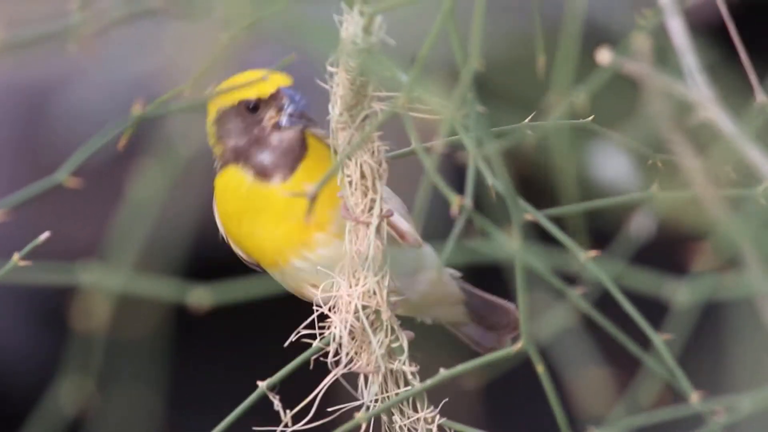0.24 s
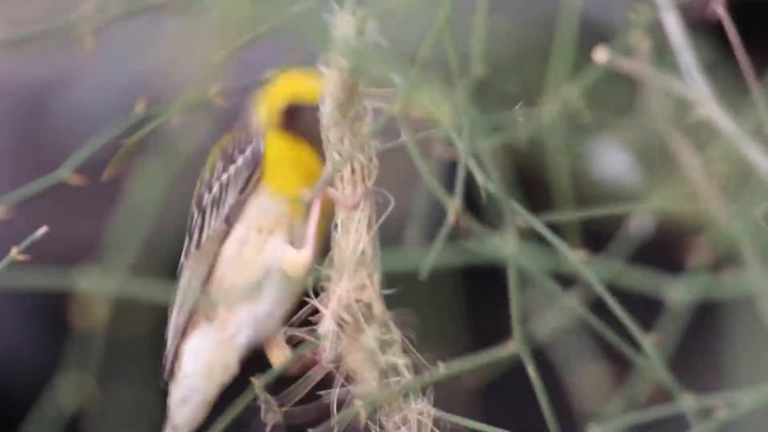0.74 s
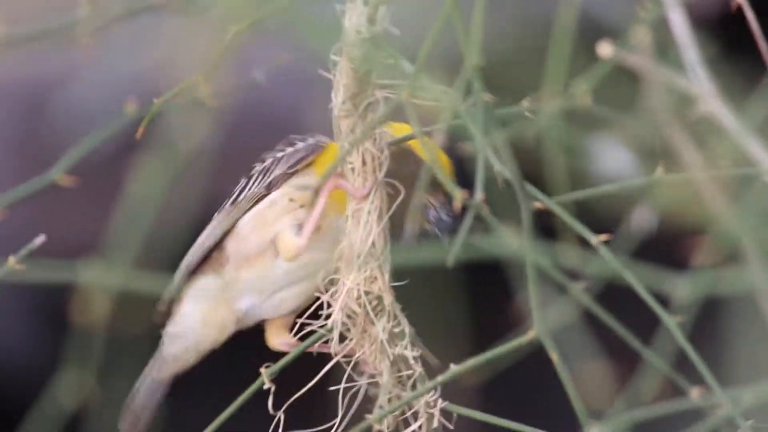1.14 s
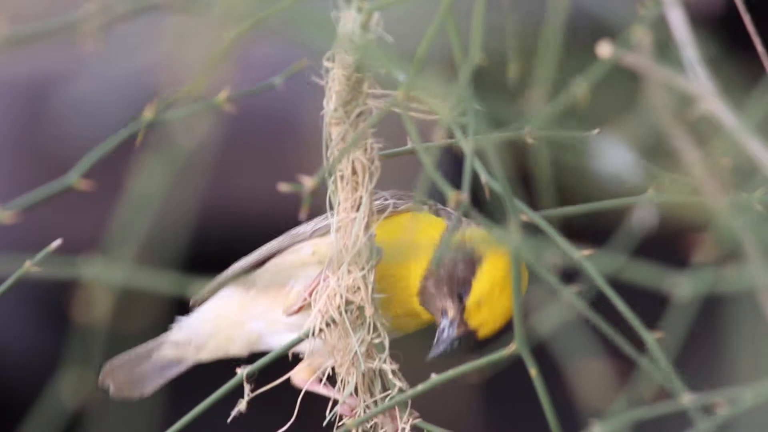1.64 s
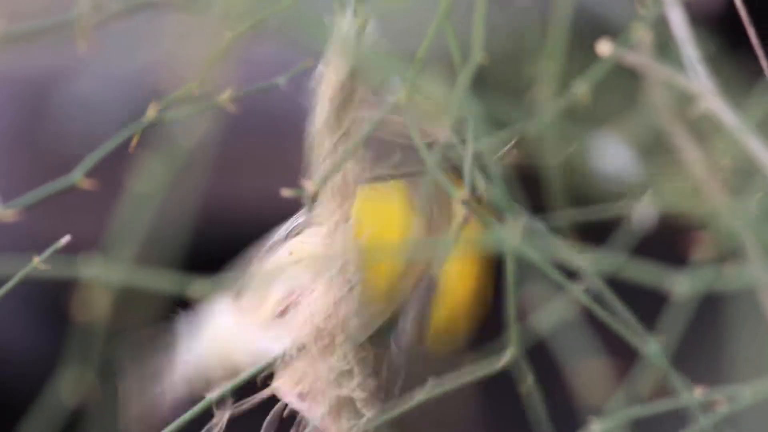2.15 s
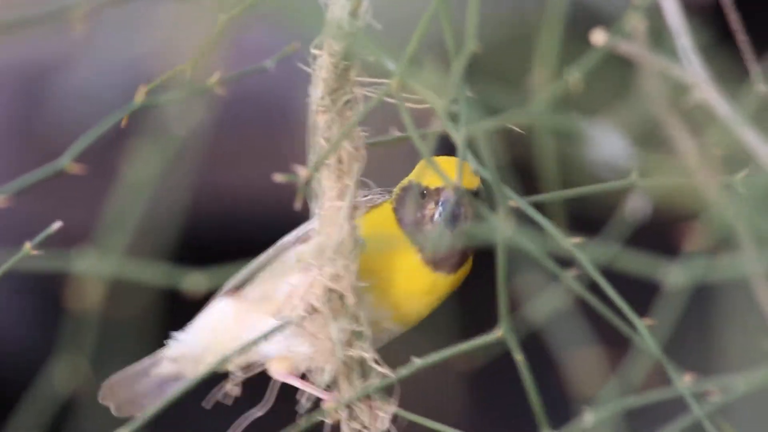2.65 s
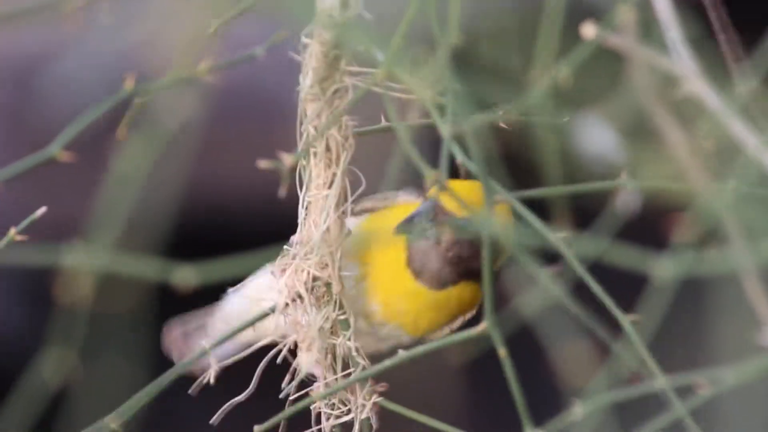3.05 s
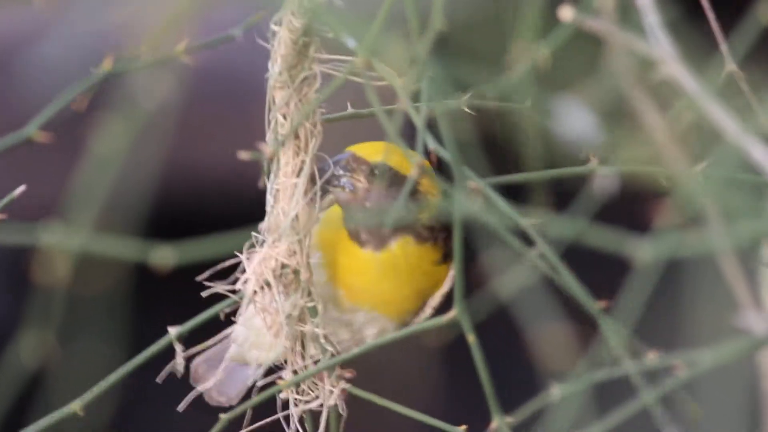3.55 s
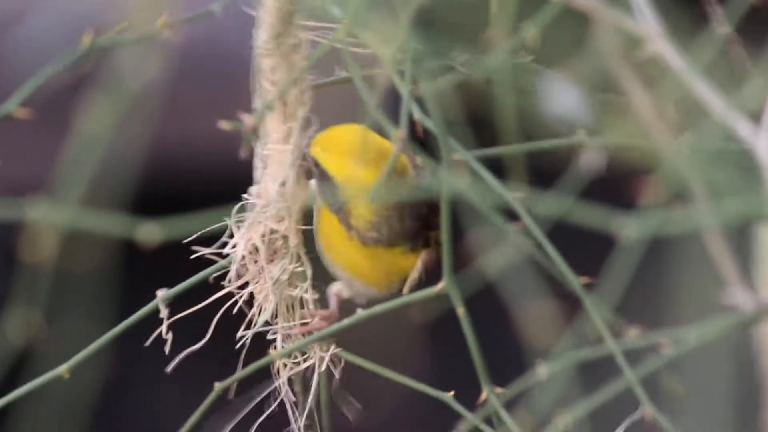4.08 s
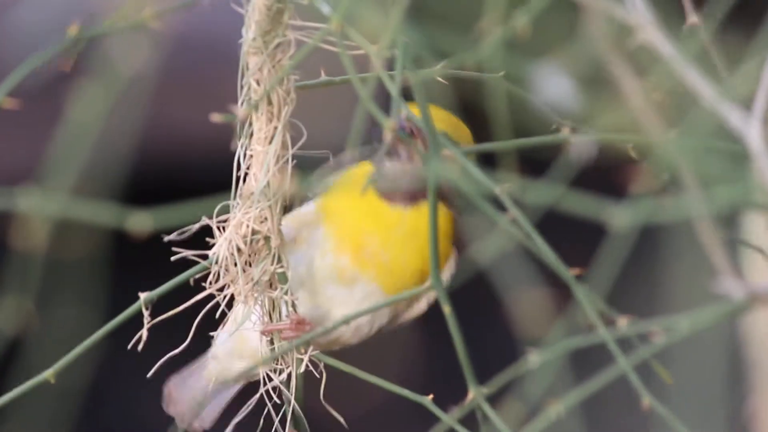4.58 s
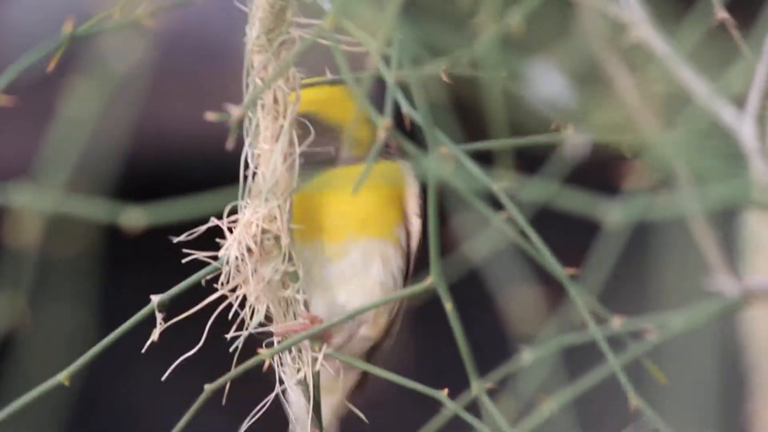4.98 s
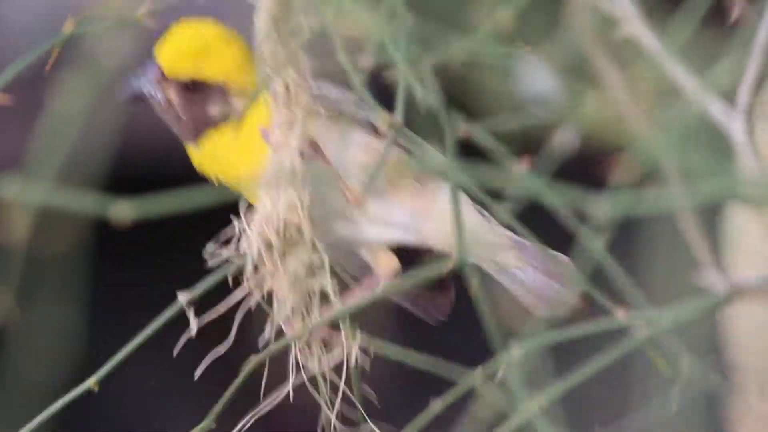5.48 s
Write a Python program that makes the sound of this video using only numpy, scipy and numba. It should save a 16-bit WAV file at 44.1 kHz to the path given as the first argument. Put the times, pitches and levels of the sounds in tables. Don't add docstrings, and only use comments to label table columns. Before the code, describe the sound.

A weaver bird colony chips, chirps and whistles rapidly in thorn scrub, turning to a noisy wheeze over plopping water and soft hiss.

```python
import sys
import numpy as np
from scipy import signal
from scipy.fft import rfft, irfft
from scipy.io import wavfile
from scipy.ndimage import uniform_filter1d
from numba import njit

SR = 44100
rng = np.random.default_rng(int(sys.argv[2]) if len(sys.argv) > 2 else 0)


def wav_out(sig):
    wavfile.write(sys.argv[1], SR, np.round(np.clip(np.atleast_2d(sig).T, -1, 1) * 32767).astype(np.int16))


def elevation(decibels):
    levels = np.asarray(decibels, float)
    return 10 ** (levels / 20)


N = 252252
TIME = np.arange(N) / SR

# (time [ms], pitch [Hz], level [dB])
CHIP = [(-14, 5250, -7), (-7.5, 4400, -6.5), (-3.5, 4080, -2), (5, 4230, 1), (10, 5250, -10),
        (15.5, 3500, -6), (19.5, 3950, -3.5), (25.5, 3330, -5), (32, 3325, -5)]
# (time [ms], pitch [Hz], level [dB])
CHIRP = [(-11, 3800, 3.5), (-5, 4800, -2), (-1.5, 5900, 0.5), (2.5, 5350, 3), (12, 3420, -4.5),
         (17, 3800, -5.5), (22, 3950, -2.5), (28.5, 5500, -0.5), (41, 2550, -9)]
# (multiple of pitch [1], level [dB])
CHIP_TONES = [(1, 2), (2, -36.5)]
CHIRP_TONES = [(1, 4), (2, -6.5), (3, -3.5), (4, -27.5)]
TWEET_TONES = [(1, 0), (2, -37)]


def level(x, db):
    return x * elevation(db) / np.sqrt(np.mean(x ** 2))


def sides(pan_db):
    return elevation(np.array([[pan_db / 2], [-pan_db / 2]]))


def on_log(table, hz):
    f, v = np.transpose(table)
    return np.interp(np.log(hz + 1), np.log(f), v)


def walk(rate):
    hold = int(SR / rate)
    steps = np.repeat(rng.standard_normal(N // hold + 1), hold)
    return 1.3 * uniform_filter1d(uniform_filter1d(steps, hold), hold)[:N]


@njit
def moving_band_pass(x, hz, width):
    y, band, low = np.empty(len(x)), 0., 0.
    for i in range(len(x)):
        g, damping = np.tan(np.pi * hz[i] / SR), width / hz[i]
        v = (band + g * (x[i] - low)) / (1 + g * (g + damping))
        band, low, y[i] = 2 * v - band, low + 2 * g * v, damping * v
    return y


def rasp(throat, per_s):
    pulses = (rng.random(N) < per_s / SR) * rng.standard_normal(N)
    pulses = pulses + 0.079 * rng.standard_normal(N)
    voice = 0
    for hz, width, db in throat:
        centre = hz + np.zeros(N)
        once = moving_band_pass(pulses, centre, 1. * width)
        voice = voice + level(moving_band_pass(once, centre, 1. * width), db)
    return voice


def sing_note(out, s, hz, db, tones, pan_db, waver=.011, flutter_db=3.2):
    # (frequency [Hz], gain [dB])
    beak = [(2000, -3), (4500, 0), (5800, 0), (7200, 5), (9000, -5), (11000, -10), (16000, -19)]
    i = np.arange(max(int(s[0] * SR), 0), min(int(s[-1] * SR), N))
    if len(i) < 90:
        return
    smooth = lambda v: uniform_filter1d(v, size=80)
    chance = 9 * rng.standard_normal((2, len(i)))
    pitch = smooth(np.interp(i / SR, s, hz) * (1 + waver * chance[0]))
    edge = np.clip(np.minimum(i - i[0], i[-1] - i) / (.003 * SR), 0, 1)
    phase = 2 * np.pi * (np.cumsum(pitch) / SR + rng.random())
    overtone_flutter = flutter_db * smooth(chance[0, ::-1])
    wave = 0
    for k, tone_db in tones:
        gain_db = tone_db + on_log(beak, k * pitch) + (k > 1) * overtone_flutter
        wave = wave + elevation(gain_db) * np.sin(k * phase) * (k * pitch < .4 * SR)
    loudness = elevation(smooth(np.interp(i / SR, s, db) + flutter_db * chance[1]))
    out[:, i] += sides(pan_db) * np.sqrt(2) * wave * edge * loudness


def repeat(out, shape, rows, tones):
    ms, hz, db = np.transpose(shape)
    for s, peak_db, factor, pan_db in rows:
        sing_note(out, s + ms / 1000, hz * factor, db + peak_db, tones, pan_db)


def air():
    # (frequency [Hz], density [dB per Hz])
    spectrum = [(18, -54.5), (30, -25.5), (173, -15), (546, -18), (1330, -10), (2020, -10), (2840, -9),
                (3230, -4), (4090, -3.5), (4420, -10.5), (9940, -23), (15500, -39.5)]
    # (frequency [Hz], left-right correlation [1])
    likeness = [(40, -.75), (85, -.6), (150, .7), (600, .9), (3000, .55), (8000, .3), (15000, -.2)]
    hz = np.fft.rfftfreq(N, 1 / SR)
    like = np.clip(on_log(likeness, hz), -1, 1)
    colour = elevation(on_log(spectrum, hz))
    mid = rfft(rng.standard_normal(N)) * colour
    side = rfft(rng.standard_normal(N)) * colour * np.sqrt((1 - like) / (1 + like))
    pan_db = np.where(hz < 90, 3.2, -3.9)
    pair = np.array([mid + side, mid - side]) * elevation(pan_db * np.array([[.5], [-.5]]))
    edges = [250, 400, 600, 850, 1200, 1700, 2500]
    out = irfft(pair * ((hz < edges[0]) | (hz >= edges[-1])), N)
    for lo, hi in zip(edges, edges[1:]):
        flicker_db = 1.8 * walk(30) - 1.5
        out += irfft(pair * (hz >= lo) * (hz < hi), N) * elevation(flicker_db)
    return level(out, -31.5)


def water(count=130):
    # (time [s], peak level [dB], pitch [Hz], pitch change per ring [factor])
    plops = [(.335, -22, 941, 1.92), (.858, -25.5, 913, 1.53), (1.354, -22.5, 740, 0.74),
             (1.684, -34, 795, 1.48), (2.334, -22, 920, 1.05), (2.375, -24.5, 895, 1.4),
             (2.467, -29.5, 343.5, 0.82), (2.504, -28.5, 685, 0.82), (3.786, -28.5, 900, 1.55),
             (3.827, -28.5, 545, 0.89), (3.956, -28.5, 792, 1.27), (4.662, -27.5, 840, 0.75),
             (5.359, -32, 784, 0.82), (5.498, -32, 623, 1.64), (5.597, -28, 680, 0.47)]
    drips = [(.596, -23.5, 1565, 0.56), (0.6975, -20, 1603, 1.56), (.835, -26, 1790, 1.54),
             (2.373, -32, 1540, 1.1), (3.216, -21.5, 2120, 0.96), (3.301, -18, 2136, 0.96),
             (4.029, -28, 1390, 0.99), (4.215, -27.5, 1516, 0.98), (5.5941, -25.5, 1407, 2.4)]
    gurgles = [(.942, -36.5, 601, 1.96), (1.482, -37.5, 380.8, 1.07), (1.538, -37.5, 615, 1.95),
               (1.8, -40.5, 738, 1.07), (2.045, -43, 591.7, 1.27), (2.072, -43.5, 600.6, 1.104),
               (2.098, -46.5, 597.6, 0.85)]
    clops = [(.337, -28, 600, 1.2), (2.329, -21, 500, 1.3), (3.787, -29, 600, 1.2), (4.286, -25, 520, 1.2),
             (4.408, -33, 700, 1.2), (5.004, -29, 480, 1.2)]
    kinds = [(plops, 6.3), (drips, 7.0), (gurgles, 19), (clops, 1.6)]
    bubbles = [(*row, cycles) for rows, cycles in kinds for row in rows]
    when, size, pitch, ring = rng.random((count, 4)).T
    faint = [when * N / SR, -48 + 10 * size, 480 * 3.5 ** pitch, 0.51 + 1.05 * ring, 3 + 9 * ring]
    out = np.zeros(N + SR)
    for s, db, hz, rise, cycles in bubbles + list(np.transpose(faint)):
        cycles = max(cycles, 1)
        u = np.arange(int(2 * cycles / hz * SR)) * hz / SR / cycles
        phase = 2 * np.pi * np.cumsum(hz * rise ** (u - .4)) / SR
        envelope = np.exp(-2.3 * u) * np.minimum(u / 0.0506, 1)
        out[int(s * SR):int(s * SR) + len(u)] += elevation(db) * np.sin(phase) * envelope
    return sides(-9.0) * out[:N]


def scrub(x, t60=.4):
    t = np.arange(int(.5 * SR)) / SR
    decay = np.exp(-np.log(1000) * t / t60) * np.minimum(t / .02, 1)
    tail = rng.standard_normal((2, len(t))) * decay
    tail = 2.13 * tail + 0.225 * tail[::-1]
    tail = signal.lfilter([1], [1, -.45], tail)
    tail /= np.sqrt(np.sum(tail ** 2, axis=1, keepdims=True))
    for late_s in (.066, .102):
        tail[:, int(late_s * SR)] += elevation(-8)
    return sides(-0.5) * signal.fftconvolve(x.mean(0)[None], tail, axes=1)[:, :N]


def twigs(x, count=22):
    lag, size = rng.random((2, 2, count))
    out = x.copy()
    for ear in range(2):
        delays = (lag[ear] * 0.028 * SR).astype(int) + 30
        for late, gain in zip(delays, size[ear]):
            out[ear, late:] += elevation(-14.5) * (2 * gain - 1) * x[ear, :-late]
    return out


def far_flock(count=520):
    # (time [s], level [dB])
    swell = [(0, -35), (.46, -34.5), (.62, -38.5), (1.65, -32.5), (2.01, -46.5), (2.26, -33.5),
             (2.75, -37.5), (3.45, -30.5), (4.0, -27), (4.5, -29.5), (4.75, -25.5), (5.0, -28.5),
             (5.2, -22), (5.55, -26), (5.72, -24.5)]
    out = np.zeros((2, N))
    when, size, pitch, place = rng.random((count, 4)).T
    rows = np.transpose([when * N / SR, 9 * size, .9 + .2 * pitch, -3.5 + 16 * (place - .5)])
    repeat(out, CHIP, rows[::2], CHIP_TONES)
    repeat(out, CHIRP, rows[1::2], CHIRP_TONES)
    return level(out, -2.0) * elevation(np.interp(TIME, *np.transpose(swell)))


def scolding():
    # (start [s], held [s], level [dB])
    scolds = [(-.02, 0.0197, -39), (.25, 0.054, -49), (.56, .04, -55), (.75, 0.0414, -37.5),
              (1.22, .05, -55.5), (1.505, 0.0275, -38), (1.85, 0.017, -44.5), (2.45, 0.03, -48),
              (2.73, 0.092, -47.5), (2.83, .003, -39.5), (2.985, 0.096, -41), (3.15, 0.15, -41.5),
              (3.245, 0.0717, -34.5), (3.44, 0.28, -39.5), (3.68, 0.029, -37.5), (3.83, 0.075, -40),
              (3.92, 0.185, -44), (4.615, 0.016, -37.5), (4.65, .27, -41), (4.935, 0.0095, -38),
              (5.15, .15, -38.5), (5.325, 0.024, -35.5), (5.44, 0.059, -42), (5.68, 0.026, -40)]
    # (frequency [Hz], width [Hz], level [dB])
    throat = [(2298, 1052, 4), (4300, 1040, 5.5), (6500, 1100, 7), (9360, 4200, -0.5), (12740, 960, -17.5)]
    pair = sum(sides(pan_db) * rasp(throat, 2000) for pan_db in (-12.0, 8.0))
    s, held, db = np.transpose(scolds)[:, :, None]
    swell_db = 400.5 * np.maximum(s - TIME, 0)
    fade_db = 284.5 * np.maximum(TIME - s - held, 0)
    effort_db = db - swell_db - fade_db
    return pair * elevation(np.maximum(effort_db.max(0), -54) - 9)


def wheeze():
    # (time [s], effort [dB], throat resonance [Hz], its strength [dB])
    effort = [(3.41, -57.5, 4060, 0), (3.45, -31.5, 3958, 1.5), (4.0, -30.5, 4300, 0.5),
              (4.3, -29.5, 4410, 0.5), (4.62, -29, 4377, -2), (4.72, -31, 4350, -15),
              (5.02, -32.5, 3920, -15.5), (5.3, -27.5, 4250, -7.5), (5.55, -35.5, 4010, -4),
              (5.72, -31.5, 4350, -8)]
    # (frequency [Hz], width [Hz], level [dB])
    steady = [(3132, 1120, -2), (3700, 496, -6.5), (5600, 646, -1), (7000, 1200, -13)]
    s, effort_db, mouth_hz, mouth_db = np.transpose(effort)
    moving = (np.interp(TIME, s, mouth_hz), 260, np.interp(TIME, s, mouth_db))
    pair = sum(sides(pan_db) * rasp(steady + [moving], 700) for pan_db in (-10.0, 1.5))
    return pair * elevation(np.interp(TIME, s, effort_db, left=-99, right=-99) - 6.5 + walk(30))


def trill():
    # (time [s], pitch [Hz], level [dB])
    whistle = [(2.63, 2770, -37), (2.681, 2755, -38.5), (2.735, 2948, -26.5), (2.781, 3201, -25),
               (2.922, 3140, -26), (3.029, 3042, -21.5), (3.068, 3024, -45), (3.102, 3070, -26),
               (3.149, 2984, -48)]
    out = np.zeros((2, N))
    sing_note(out, *np.transpose(whistle), TWEET_TONES, -3.0, waver=0.00102, flutter_db=1.0)
    depth = np.clip((2.965 - TIME) / .02, 0, 1) * np.clip((TIME - 2.685) / .02, 0, 1)
    throb = np.cos(2 * np.pi * 57.7 * (TIME - 2.84))
    open_share = np.clip(.55 + .8 * throb, 0, 1)
    return out * (1 + depth * (1.48 * open_share - 1))


def perched_birds():
    # (start [s], length [s], middle pitch [Hz], level [dB]); the two 4 kHz pips at 1.77
    # s and 1.794 s are echoes of the chip at 1.705 s
    arches = [(.718, 0.037, 7430, -39), (.8, 0.0413, 6403, -35.5), (1.297, 0.0097, 5284, -27),
              (1.395, 0.0577, 6954, -36.5), (2.895, 0.035, 7100, -37.5), (3.482, 0.032, 6960, -33.5)]
    falls = [(3.32, 0.0166, 5200, -31), (3.472, 0.0092, 6860, -27), (3.657, 0.031, 4916, -31.5),
             (3.687, 0.0086, 7060, -31.5), (3.863, 0.0157, 7340, -33), (3.997, 0.0121, 7000, -35.5),
             (4.065, 0.017, 7410, -36), (4.088, 0.014, 6550, -29.5), (4.738, 0.0312, 3911, -24)]
    rises = [(.298, 0.021, 3990, -25.5), (.32, 0.0165, 3575, -25.5), (1.493, 0.031, 6670, -36),
             (5.42, .024, 4650, -23)]
    pips = [(.003, 0.0243, 6140, -28), (.202, 0.0255, 6600, -42), (.293, 0.0126, 3036, -28),
            (.942, 0.036, 4900, -32), (1.658, 0.0304, 6130, -31.5), (1.77, .014, 4050, -29.5),
            (1.794, .02, 4060, -31.5), (2.203, 0.017, 5500, -37), (3.265, 0.0157, 6650, -46),
            (4.532, 0.0306, 6900, -39.5), (4.56, 0.0118, 6950, -42.5), (4.768, 0.0125, 6450, -36),
            (4.858, 0.036, 6200, -34.5), (5.158, 0.016, 5600, -40.5), (5.195, 0.028, 5600, -26),
            (5.208, 0.015, 4250, -38), (5.35, 0.0112, 5100, -24), (5.545, 0.01025, 5450, -37),
            (5.65, 0.0098, 7500, -33), (5.652, 0.013, 5800, -28.5), (5.695, 0.022, 5300, -26.5),
            (5.087, 0.033, 5500, -34), (5.154, 0.037, 7090, -36), (5.276, 0.0125, 5450, -39),
            (5.299, 0.0123, 5550, -31), (5.313, 0.0103, 5400, -21.5), (5.498, 0.0214, 5430, -31.5),
            (5.41, 0.022, 5800, -30)]
    # (time [s], pitch [Hz], level [dB])
    whistles = [
        [(.932, 3500, -26), (.944, 4330, -27), (.965, 4120, -24.5), (.986, 3850, -26)],
        [(3.2, 3604, -40), (3.21, 3744, -42.5), (3.222, 3760, -27), (3.314, 3765, -29.5), (3.32, 3774, -38.5),
         (3.35, 3720, -39.5)],
        [(4.665, 4900, -36), (4.68, 4850, -29), (4.708, 4780, -24.5), (4.72, 4650, -29), (4.74, 4450, -23),
         (4.8, 4150, -21), (4.846, 3950, -23), (4.875, 4000, -27.5), (4.93, 4049, -43.5)],
        [(4.955, 2950, -38), (4.975, 2450, -33.5), (4.99, 2150, -37), (5.0, 2050, -40), (5.015, 2020, -40),
         (5.052, 2020, -32.5)],
        [(5.222, 5300, -25.5), (5.235, 4750, -25), (5.248, 4400, -26), (5.264, 4150, -27.5), (5.28, 4550, -27),
         (5.288, 4650, -20), (5.302, 4120, -22.5)],
        [(5.305, 4446, -27), (5.348, 4135, -22.5), (5.402, 3887, -22.5), (5.44, 3760, -29), (5.452, 3950, -22),
         (5.46, 4500, -33.5)],
        [(5.46, 4950, -21.5), (5.475, 4350, -24), (5.492, 4100, -30), (5.509, 4650, -24.5)],
        [(5.52, 4150, -29), (5.534, 4150, -31), (5.547, 4700, -24)],
    ]
    out = np.zeros((2, N))
    arc = np.linspace(0, 1, 9)
    kinds = [(arches, .82, .84), (falls, 1.13, .88), (rises, .87, 1.09), (pips, 1.005, .97)]
    for rows, first, last in kinds:
        bend = first + (last - first) * arc + (1 - (first + last) / 2) * 4 * arc * (1 - arc)
        for s, length, hz, db in rows:
            swell_db = db - 5 * (2 * arc - 1) ** 2
            sing_note(out, s + length * arc, hz * bend, swell_db, TWEET_TONES, -3.0, waver=.007)
    for note in whistles:
        sing_note(out, *np.transpose(note), TWEET_TONES, -3.5, waver=.003, flutter_db=1.5)
    return out


def bush_birds():
    # (time [s], level [dB], pitch factor [1], left minus right [dB])
    chips = [(-0.004, -22, 0.986, -8.5), (0.185, -25.5, 0.959, -7), (0.399, -25.5, 0.96, -6.5),
             (0.582, -25, 0.979, -9), (0.778, -23, 0.983, -4.5), (0.992, -25, 0.899, -8),
             (1.204, -26.5, 0.965, -8), (1.477, -24.5, 0.959, -6.5), (1.705, -25, 0.981, -8),
             (1.954, -26.5, 0.956, -8.5), (2.16, -26.5, 0.949, -9), (2.331, -26, 1, -7.5),
             (2.508, -25, 0.951, -4), (2.699, -28, 0.908, -10), (2.916, -25.5, 0.984, -7),
             (3.164, -28, 0.984, -12.5), (3.372, -25.5, 0.922, -6.5), (3.544, -28.5, 0.968, -8.5),
             (3.698, -29.5, 0.97, -8.5), (3.9, -29, 0.947, -10)]
    chirps = [(0.26, -30.5, 0.954, -3), (0.564, -30, 0.967, -0.5), (0.786, -32.5, 0.978, -1.5),
              (1.23, -29.5, 0.933, -1), (1.513, -32.5, 0.969, -0.36), (2.453, -31, 0.95, -1),
              (2.723, -29.5, 0.911, -1.5), (2.993, -27, 0.977, -2), (3.15, -28, 0.931, -2.6),
              (3.817, -31, 0.936, -3), (4.613, -28.5, 1.0, -1.67), (4.932, -29, 0.842, 0),
              (5.167, -34.5, 0.976, 1), (5.694, -40.5, 1, 2.5)]
    # (time [s], pitch [Hz], level [dB])
    warbles = [
        [(.345, 4416, -26), (.36, 3700, -31), (.372, 3225, -28), (.38, 3070, -34)],
        [(1.9, 5600, -38), (1.912, 5400, -33), (1.922, 7100, -40), (1.93, 7422, -40), (1.949, 6500, -34.5)],
        [(1.995, 5380, -34.5), (2.006, 6100, -34), (2.013, 7057, -37), (2.022, 6920, -43.5)],
        [(2.118, 5786, -38.5), (2.13, 5600, -40.5), (2.14, 4900, -39)],
        [(2.268, 5560, -39), (2.285, 5420, -43.5), (2.3, 5430, -39.5), (2.312, 5090, -37.5),
         (2.322, 4630, -30.5)],
        [(2.345, 4132, -36), (2.358, 3216, -34), (2.372, 3950, -29.5), (2.386, 3290, -32.5),
         (2.398, 3950, -29.5)],
        [(2.42, 4093, -20.5), (2.43, 3483, -30), (2.44, 3067, -27), (2.448, 4220, -31.5)],
        [(2.535, 3887, -31.5), (2.541, 3120, -35.5), (2.548, 3910, -35), (2.555, 3100, -34.5)],
        [(3.578, 6600, -47), (3.594, 7000, -37), (3.612, 6540, -38), (3.633, 6220, -33)],
        [(5.048, 3944, -36.5), (5.058, 3475, -28), (5.066, 4132, -28.5), (5.074, 3277, -26.5),
         (5.082, 4070, -29), (5.09, 3200, -25), (5.098, 3890, -33.5)],
        [(5.115, 4354, -26), (5.128, 3700, -33), (5.14, 3050, -33.5)],
        [(5.484, 3499, -25), (5.495, 3700, -28.5), (5.508, 3580, -36), (5.52, 3646, -27.5), (5.53, 3500, -37),
         (5.555, 3503, -29.5)],
        [(5.655, 3555, -34), (5.67, 4600, -32.5), (5.682, 3700, -31), (5.692, 4800, -26.5), (5.703, 4300, -31),
         (5.72, 3473, -27)],
    ]
    # (time [s], pitch [Hz], level [dB])
    twitters = [
        [(3.03, 7367, -40), (3.052, 6035, -38.5), (3.056, 5536, -36.5), (3.06, 6302, -35), (3.069, 7200, -35.5),
         (3.079, 5500, -37.5), (3.087, 6374, -35), (3.095, 5064, -44), (3.106, 5600, -43)],
        [(4.335, 4496, -38), (4.35, 3700, -35), (4.365, 4478, -33.5), (4.385, 3600, -30), (4.4, 4300, -33),
         (4.42, 3700, -36)],
    ]
    out = np.zeros((2, N))
    repeat(out, CHIP, chips, CHIP_TONES)
    repeat(out, CHIRP, chirps, CHIRP_TONES)
    for note in warbles + twitters:
        sing_note(out, *np.transpose(note), TWEET_TONES, -3.5, waver=.008, flutter_db=4)
    return twigs(out)


def scene():
    near = bush_birds() + perched_birds()
    whistle, far, stream = trill(), far_flock(), water()
    harsh = wheeze() + scolding()
    sent = elevation(-5.5) * near + elevation(-7.5) * whistle + elevation(-2.0) * far
    sent = sent + elevation(-15.0) * harsh + elevation(-11) * stream
    return near + whistle + elevation(-4.0) * far + harsh + stream + scrub(sent) + air()


def band_limit(x):
    return signal.sosfilt(signal.butter(12, 15660, fs=SR, output="sos"), x)


def record(dry):
    u = np.clip(TIME - .862, 0, 1)
    thud = elevation(-20.5) * np.sin(2 * np.pi * 85 * u) * np.exp(-u / 0.011)
    thud = thud * np.array([[1], [-.3]])
    low_cut = signal.butter(2, 36, "high", fs=SR, output="sos")
    return band_limit(signal.sosfilt(low_cut, dry + thud))


dry = scene()
out = record(dry)
wav_out(out)
```